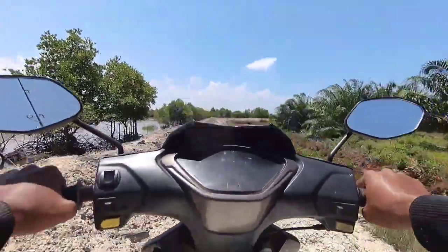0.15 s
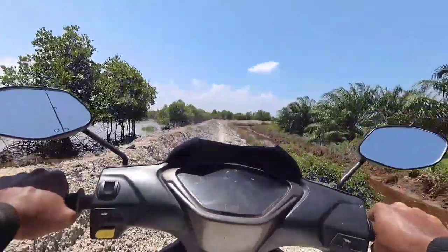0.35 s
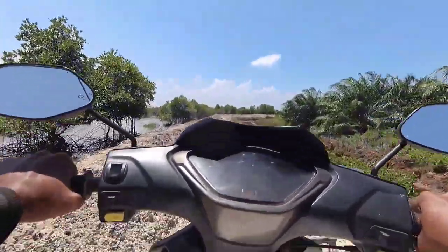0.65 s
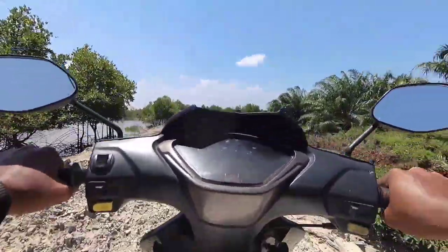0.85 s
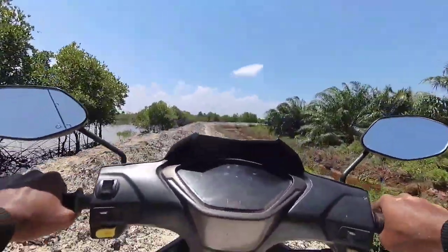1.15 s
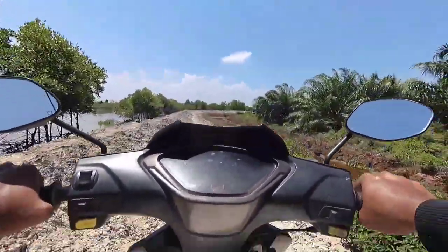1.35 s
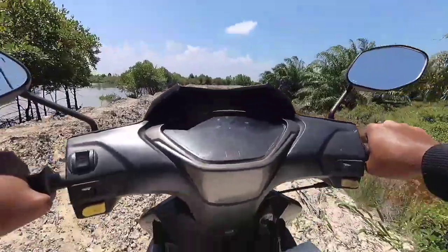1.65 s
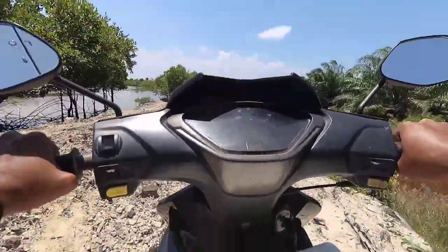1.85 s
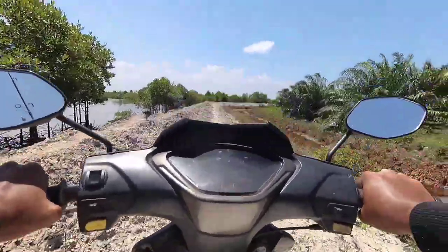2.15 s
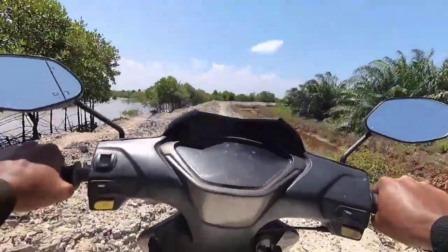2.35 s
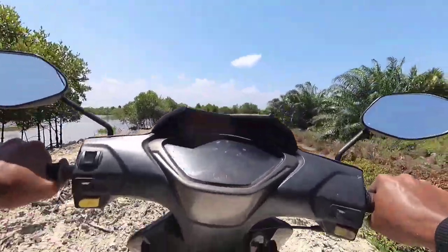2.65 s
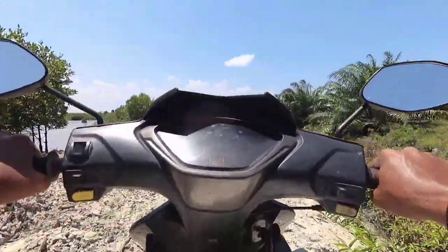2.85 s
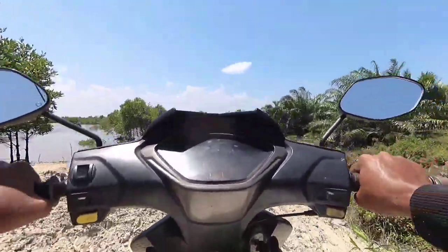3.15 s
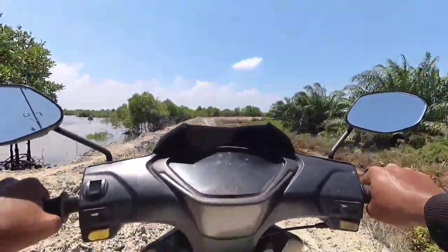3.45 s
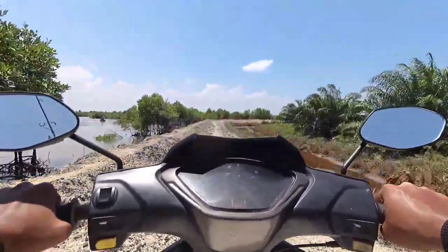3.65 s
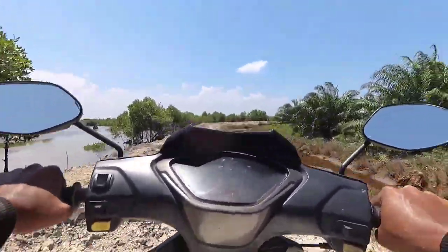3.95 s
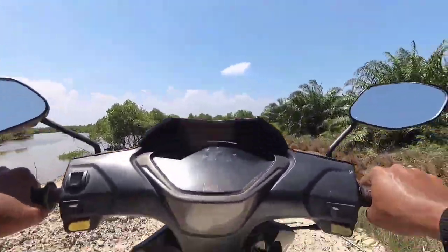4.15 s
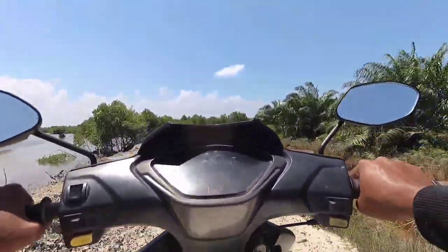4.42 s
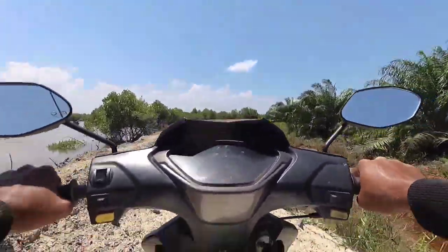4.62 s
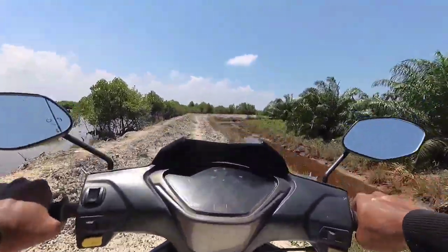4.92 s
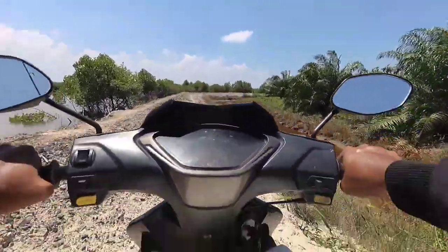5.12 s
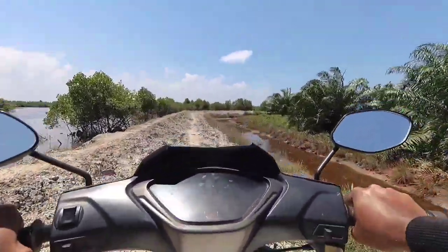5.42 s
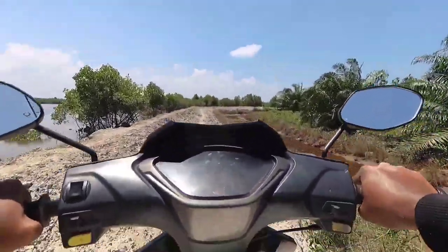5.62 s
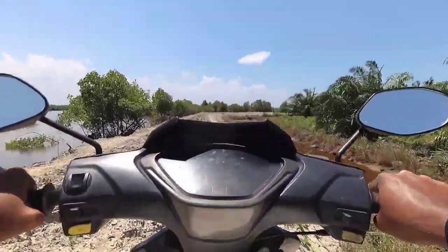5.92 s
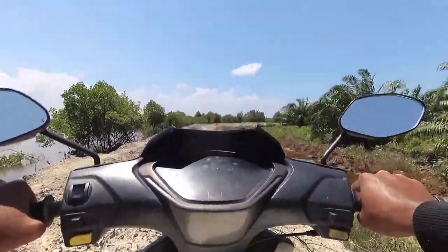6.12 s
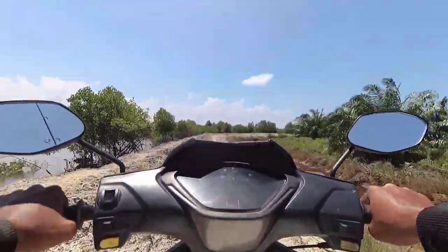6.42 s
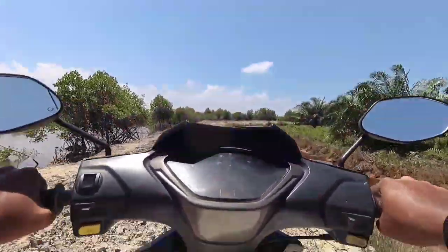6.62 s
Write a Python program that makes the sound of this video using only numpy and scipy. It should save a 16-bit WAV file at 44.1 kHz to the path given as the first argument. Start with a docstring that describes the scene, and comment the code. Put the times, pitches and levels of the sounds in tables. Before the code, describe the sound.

Close up and only in the left channel, a small scooter putts along a rough gravel track, with plastic and metal parts ticking and buzzing. Tyres and air roar hollowly through the bodywork and stones knock against it. The engine slows to a chug, recovers, then slows and pulls up again near the end. Past the middle a short swish passes with a thin squeal. Light wind rumbles on the microphone.

```python
"""Thumping exhaust, a hollow roar and rattling panels: a small single-cylinder scooter, heard close,
rolls slowly along a stony track, the throttle opening and closing. Each firing thumps in the exhaust
and shakes the frame; tyres and air roar through the hollow bodywork, stones and bumps knock it,
and a bright swish passes with a thin squeal. Only the left microphone is live, with wind rumbling
on it; the right one gives nothing but its own faint noise."""
import sys
import numpy as np
from scipy import signal
from scipy.fft import rfft, irfft, next_fast_len
from scipy.io import wavfile
from scipy.ndimage import uniform_filter1d, minimum_filter1d

SR = 44100
rng = np.random.default_rng(int(sys.argv[2]) if len(sys.argv) > 2 else 0)


def persist_wave(psi):
    """Save psi, clipped to +-1, as 16-bit WAV."""
    counts = np.round(np.clip(psi, -1, 1) * 32767).astype(np.int16)
    wavfile.write(sys.argv[1], SR, np.atleast_2d(counts).T)


N = 298557

# engine speed: time_s, firings_per_s
ENGINE_SPEED = [(0.0, 20.01), (0.4, 19.53), (1.1, 19.53), (1.4, 15.27), (1.8, 14.75), (2.1, 13.87),
                (2.35, 14.77), (2.55, 19.13), (2.85, 20.75), (3.3, 20.79), (4.7, 20.75), (4.95, 19.61),
                (5.45, 14.9), (5.9, 17.06), (6.1, 19.88), (6.35, 20.0), (6.55, 19.16), (6.77, 20.22)]
# how hard the engine pulls and how loud the track is: time_s, thump_db, roar_db, panel_hum_db
RIDE_LEVELS = [(0.0, -19.5, -13, -15.5), (0.5, -20.5, -14, -16), (1.1, -18.5, -13.5, -18),
               (1.35, -23, -14, -28), (1.8, -28, -17.5, -23), (2.2, -28, -18, -25.5),
               (2.62, -20.5, -14, -22), (3.0, -18, -13, -17), (3.5, -22.5, -13.5, -23.5),
               (3.8, -23.5, -14, -21), (4.3, -21, -16, -22.5), (4.7, -25.5, -14, -24.5),
               (5.05, -25, -18, -22.5), (5.3, -30.5, -21, -25.5), (5.65, -32.5, -21.5, -27),
               (6.05, -20.5, -15, -22), (6.5, -22.5, -11.5, -23.5), (6.77, -31, -14, -20)]
# the engine labours as it picks up and its chugs stand apart: centre_s, half_length_s, throb_db
LABOURING = [(2.4, 0.12, 3), (5.88, 0.096, 1.5)]
# what each engine cycle rings in the frame: cycle_share, pitch_hz, width_hz, level_db
FRAME_MODES = [(0.3, 409.7, 20.8, 6.5), (0.336, 375.4, 6.7, -8), (0.499, 278, 23, 1.5),
               (0.553, 242.3, 28, 4.5), (0.623, 198.6, 7.9, 0.5), (0.819, 756, 63, -23),
               (0.953, 654, 54, -3.5)]
# tyre and air roar, before the bodywork shades it: frequency_hz, density_db
ROAR_SPECTRUM = [(15, -54), (25, -29.5), (53, -29), (107, -13), (168, -2), (273, 0), (319, -0.5),
                 (508, -5.5), (605, -4.5), (735, -20), (1000, -10), (1270, -31.5), (2060, -16),
                 (2450, -61.5), (2600, -39), (3380, -69), (5720, -120)]
# two hollow spaces in the bodywork: pitch_hz, width_hz
CAVITY_MODES = [(275, 60), (415, 60)]
# how loud each cavity sings against the roar: time_s, lower_db, upper_db
CAVITY_LEVELS = [(0.0, -9.5, -11.5), (6.77, -7.5, -13)]
# the hollow panel's note: time_s, pitch_hz, width_hz
PANEL_NOTE = [(0, 615, 95), (.6, 605, 80), (.86, 622, 80), (.95, 648, 150), (1.25, 627, 150),
              (1.52, 532, 50), (1.62, 600, 60), (2.2, 580, 120), (2.8, 612, 55), (3.1, 590, 50),
              (3.27, 568, 55), (3.5, 590, 40), (3.85, 603, 45), (4.2, 620, 100), (4.35, 685, 70),
              (4.6, 680, 80), (4.75, 620, 90), (5.4, 586, 80), (6.2, 605, 60), (6.5, 630, 120),
              (6.77, 607, 65)]
# the hollow panel hums up briefly: centre_s, half_length_s, lift_db
PANEL_SWELLS = [(1.25, 0.053, 8), (1.585, 0.028, 16.5), (3.3, 0.072, 7), (4.71, 0.025, 8.5),
                (5.04, 0.037, 5.5), (6.33, 0.17, 6.5), (6.7, 0.032, 2.5)]
# rough patches under the wheels: centre_s, half_length_s, rattle_lift_db, frame_lift_db
ROUGH_PATCHES = [(0.17, 0.13, 6.5, 1.5), (0.353, 0.018, 12, 5.5), (0.428, 0.019, 11.5, 9.5),
                 (0.477, 0.019, 8.5, 7.5), (0.623, 0.076, 9.5, 4), (0.776, 0.073, 10, 2.5),
                 (1.023, 0.11, 8.5, 7), (1.24, 0.073, 9.5, 5.5), (1.315, 0.045, 6, -5),
                 (1.615, 0.071, 15, 14), (1.71, 0.0096, 12, 10.5), (2.055, 0.025, 5, 5),
                 (2.597, 0.078, 6.5, 3.5), (2.78, 0.055, 5.5, -4), (2.982, 0.079, 8.5, 2.5),
                 (3.32, 0.076, 7, 8.5), (3.599, 0.057, 8.5, 4), (3.973, 0.062, 6.5, 10),
                 (4.249, 0.016, 8, 4.5), (4.377, 0.081, 2.5, 10), (4.501, 0.028, 1.5, 8),
                 (4.698, 0.08, 5.5, 2), (4.83, 0.033, 5, 8.5), (4.974, 0.098, 6.5, 6),
                 (5.39, .03, 1.5, 11.5), (5.5, 0.062, 3, 5), (5.59, 0.046, 7, 3.5), (6.128, 0.085, 8, 6),
                 (6.35, 0.08, 8.5, 1.5), (6.53, 0.15, 2.5, -7.5), (6.77, 0.031, 10.5, 1.5)]
# loose plastic and metal parts: pitch_hz, tick_db, t60_s, buzz_and_click_db
LOOSE_PARTS = [(1398, 0.5, 0.031, -10), (1890, 6, 0.0098, -4.5), (2190, 3, 0.017, -5.5),
               (2458, -4.5, 0.028, 0), (2780, -11, 0.017, -14.5), (2934, -8, 0.023, -13.5),
               (3300, -2, 0.017, -9.5), (3588, 2, 0.016, -4), (3795, -2.5, 0.025, -5.5),
               (4087, -3, 0.022, -8.5), (4700, -12, 0.016, -15), (5060, -18, 0.003, -25.5),
               (6260, -21, 0.01, -23), (7320, -13, 0.007, -18)]
# a panel taps its mount four times a cycle: cycle_share, level_db
PANEL_TAPS = [(0.0, -3), (0.25, 0), (0.48, -4), (0.75, 0)]
# the hardest rattle clicks: start_s, strength_db, brightness_db_per_octave
HARD_CLICKS = [(0.0458, -28, 1), (0.196, -31.5, -12), (0.3192, -46, 2.0), (0.3355, -27, 1),
               (0.3466, -30, 2.0), (0.4124, -39, 1), (0.4246, -29, 1), (0.4655, -30, -10), (0.4774, -30, 1),
               (0.5166, -31, -1), (0.5307, -29, -6.5), (0.5816, -30, -2), (0.6305, -26.5, 4),
               (0.6567, -33, 0), (0.757, -28, -1), (0.8111, -34, -2), (0.8367, -27, -5), (0.9348, -29.5, 5),
               (1.0101, -45, 0), (1.0271, -39, 2.0), (1.066, -28, 2.0), (1.2118, -28, 1), (1.2226, -27, 4),
               (1.2496, -22.5, 1), (2.023, -33, 5), (2.0464, -51, 2.0), (2.0627, -41, 10),
               (2.5242, -35, 2.0), (2.5713, -36, -3), (2.608, -30, -6), (2.7593, -28, -3),
               (2.934, -34.5, 8), (2.9652, -29, -4), (3.0283, -32, 2.0), (3.2326, -33, -0.5),
               (3.2908, -29, -3), (3.5185, -30, 4), (3.5897, -38, -2), (3.919, -33, 8), (3.9913, -36, 6),
               (4.0143, -34, 4), (4.2453, -27, 2.0), (4.3151, -39, 0), (4.3301, -28, 3), (4.398, -32, 6),
               (4.445, -35, 4), (4.6603, -30.5, 0), (4.6872, -33, -6), (4.7102, -34, 4), (4.7714, -26, 2.0),
               (4.8813, -34, -3), (4.9482, -41, -5), (4.9835, -26, -5), (5.0379, -28, 4), (5.0742, -40, 4),
               (5.1023, -31, -2), (5.1552, -37, -1), (5.2135, -42, 3), (5.3777, -30, 2.0), (5.4681, -37, 9),
               (5.4999, -41, 2.0), (5.513, -35, 7), (5.5555, -39, -3), (5.5972, -30, -9), (5.6256, -36, 12),
               (5.7763, -40, 2.0), (5.833, -33.5, 2.0), (5.894, -38, 6), (5.9474, -32.5, 2.0),
               (6.0132, -37, 4), (6.0386, -33, 8), (6.108, -32, 3.5), (6.1583, -31, -4), (6.314, -27.5, 0),
               (6.3335, -33, 2.0), (6.3565, -24, 1), (6.4846, -29, 4), (6.5266, -39, 6), (6.547, -30, 3),
               (6.564, -30, 3), (6.5994, -33, 6), (6.6857, -33, -8), (6.755, -36, 2.0)]
# knocks on the bodywork from stones and bumps, and low engine chugs as it picks up near 5.8 s:
# start_s, strength_db, pitch_hz, spread_octaves
KNOCKS_AND_CHUGS = [(.04, -14, 950, .3), (1.13, -13, 980, .1), (1.215, -13, 960, .1), (1.555, -5, 520, .08),
                    (1.575, -5, 580, .08), (1.592, -5, 580, .08), (2.046, -5, 940, .12),
                    (2.403, -10, 580, .1), (2.758, -9, 580, .2), (2.92, -13, 815, .1), (4.091, -9, 580, .2),
                    (4.326, -8, 580, .2), (4.694, -8, 580, .15), (4.962, -8, 580, .15),
                    (5.04, -7, 580, .12), (5.073, -9, 580, .12), (5.161, -19, 290, .3),
                    (5.181, -15, 290, .4), (5.179, -20, 1400, .2), (5.186, -10, 1850, .14),
                    (5.1855, -7, 1150, .5), (5.188, -6, 815, .1), (5.188, -10, 290, .5),
                    (5.408, -5, 580, .08), (5.4166, -7, 580, .08), (5.461, -10, 580, .1),
                    (5.804, -17, 500, .8), (5.865, -18, 290, .5), (5.93, -17, 290, .4),
                    (6.339, -7, 580, .1), (6.707, -7, 580, .3)]
# resonances of the bodywork: pitch_hz, level_db, t60_s
BODYWORK_MODES = [(290, 10, .03), (520, -1, .12), (580, 0, .09), (815, -6, .09), (960, -3, .04),
                  (1150, -9, .015), (1400, -6, .012), (1800, -3, .02), (2000, -3, .02)]
# a bright swish in passing: frequency_hz, density_db
SWISH_SPECTRUM = [(2500, -27.5), (4500, -1), (8000, -1.5), (10500, -11.5), (13000, -43.5)]
# colour of the air hiss: frequency_hz, density_db
AIR_SPECTRUM = [(1000, -21.5), (1500, 14.5), (3000, -1), (4500, 3.5), (6000, -2.5), (7300, -4.5),
                (8200, -12.5), (9500, -42), (15000, -95)]
# loudness of the air hiss: time_s, level_db
AIR_LEVEL = [(0, -50), (.32, -53.5), (1.24, -57.5), (1.36, -55.5), (2.28, -56), (2.75, -51.5), (3.6, -55),
             (3.7, -58), (4.6, -50.5), (5.07, -50), (5.28, -54.5), (5.62, -51), (5.7, -51), (6.13, -51.5),
             (6.77, -51.5)]
# wind on the microphone: frequency_hz, density_db
WIND_SPECTRUM = [(12, -43.5), (25, 8.5), (45, 10.5), (70, 17.5), (110, -37)]
# each microphone's own noise: frequency_hz, density_db
SELF_NOISE_SPECTRUM = [(30, -26.5), (100, -11), (240, -1), (500, -4), (1000, -11), (15000, -8.5)]

CRUISE_PER_S = 21.5   # firing rate with the throttle open
FRAME_DB, RATTLE_DB, BUZZ_DB = -7.5, -45, -1.5   # at cruise; frame against roar, buzz against ticks
FRAME_DROP_DB, RATTLE_DROP_DB, BUZZ_DROP_DB, CLICK_DROP_DB = 12.5, 17.5, 20, 22   # per unit of slowing


def exhaust(cycles, centre_share=0.807, spread_share=0.16, cruise_swings=5.65):
    """One round thump per firing, through a silencer that passes no deep bass."""
    slow_ratio = CRUISE_PER_S / in_time(ENGINE_SPEED)[0]
    uneven = slowing() * amp(-1.5 * labour_db())   # uneven with the throttle shut, evener under load
    firing = np.round(cycles - centre_share).astype(int)
    size, late = rng.standard_normal((200, 2))[firing + 1].T
    turn = cycles - centre_share - firing - 0.08 * uneven * late
    swings = cruise_swings * slow_ratio ** 0.47   # per cycle; the thump deepens less than the engine
    envelope = np.exp(-.5 * (turn * slow_ratio ** 2 / spread_share) ** 2)
    thump = amp((0.24 + 4.4 * uneven) * size) * envelope * np.sin(2 * np.pi * swings * turn)
    return amp(in_time(RIDE_LEVELS)[0]) * rms_one(butter(thump, 2, 50, "high"))


def frame(cycles):
    """The frame rings at set points of each engine cycle, louder over rough ground."""
    rung = 0
    for share, hz, width_hz, level_db in FRAME_MODES:
        shakes = once_a_cycle(cycles, share, jitter_s=0.00011, spread_db=2.5)
        rung += amp(level_db) * resonate(shakes, hz, width_hz)
    rung *= amp(0.86 * labour_db() * pulse(cycles, .75))
    level_db = in_time(RIDE_LEVELS)[1] + FRAME_DB - FRAME_DROP_DB * slowing()
    lift_db = bells(ROUGH_PATCHES)[1] + 1.4 * drift(7.5)
    return amp(level_db + lift_db) * rms_one(butter(rung, 2, [170, 800], "band"))


def roar(cycles):
    """Tyres and air sound through the hollow bodywork, all throbbing with the firing."""
    _, roar_db, panel_db = in_time(RIDE_LEVELS)
    roar_db += 0.46 * bells(ROUGH_PATCHES)[1]
    panel_db += bells(PANEL_SWELLS)[0] + 1.6 * drift(1.8)
    throb_db = (1.4 + 4 * slowing() + labour_db()) * pulse(cycles, .78)   # slow firings stand apart
    body = tyres_and_air(throb_db) + duct(throb_db) + amp(.4 * throb_db) * cavities()
    hum = amp(panel_db + 0.27 * throb_db) * hollow_panel()
    from_lull = (cycles - .28 + .5) % 1 - .5
    lull_db = -2.2 * labour_db() * np.exp(-(from_lull / .17) ** 2)   # hush between laboured chugs
    return amp(lull_db) * (amp(roar_db) * body + hum)


def tyres_and_air(throb_db, low_roar_hz=152):
    """Noise in flickering third-octave bands, duller and fuller in the bass as the engine slows."""
    tilt_db_per_octave = 1 - 1.5 * slowing() + 1.1 * drift(25)
    low_roar_db = -3 + 12.5 * slowing() + labour_db()
    shared_db = 1.9 * drift(9) + 0.44 * throb_db
    edges_hz = 25 * 2 ** np.arange(0, 6.8, 1 / 3)
    white = rng.standard_normal((2, N))
    out = 0
    for k, (low, high) in enumerate(zip(edges_hz, edges_hz[1:])):
        band = butter(white[k % 2], 2, [low, high], "band")
        hz = np.sqrt(low * high)
        colour_db = at_hz(ROAR_SPECTRUM, hz) + tilt_db_per_octave * np.log2(hz / 400)
        colour_db += low_roar_db * nearness(hz, low_roar_hz, octaves=0.35)
        out += band * amp(colour_db + shared_db + 2.13 * drift(11.7))
    return rms_one(butter(out, 4, 1000))   # the bodywork shades the treble


def hollow_panel(narrow_hz=22, wide_hz=170):
    """A hollow panel picks a wavering note out of the noise: slow noise carried on that pitch."""
    note_hz, width_hz = in_time(PANEL_NOTE)
    phase = 2 * np.pi * np.cumsum(note_hz) / SR
    narrow = rms_one(butter(rng.standard_normal((2, N)), 2, narrow_hz / 2))
    wide = rms_one(butter(rng.standard_normal((2, N)), 2, wide_hz / 2))
    wide_share = np.clip((width_hz - narrow_hz) / (wide_hz - narrow_hz), 0, 1)
    slow = np.sqrt(1 - wide_share) * narrow + np.sqrt(wide_share) * wide
    return rms_one(slow[0] * np.cos(phase) + slow[1] * np.sin(phase))


def cavities():
    """Two spaces in the bodywork resonate with noise, swelling and fading."""
    return sum(amp(db + 1.7 * drift(5)) * resonant_noise(hz, width_hz, passes=2)
               for (hz, width_hz), db in zip(CAVITY_MODES, in_time(CAVITY_LEVELS)))


def duct(throb_db):
    """A duct under the seat resonates in a steep-sided band of noise."""
    return amp(-21 + 2 * drift(26) + 1.2 * throb_db) * resonant_noise(hz=998, width_hz=248, passes=3)


def rattle(cycles):
    """Ticks, buzz and hard clicks ring the same loose parts, easing as the engine slows."""
    level_db = RATTLE_DB - RATTLE_DROP_DB * slowing() + bells(ROUGH_PATCHES)[0] + 1.5 * drift(22)
    buzz_db = BUZZ_DB - BUZZ_DROP_DB * slowing() + drift(3.5)
    chatter = loose_ticks(cycles) + amp(buzz_db) * panel_buzz(cycles)
    return butter(amp(level_db) * chatter + hard_clicks(), 3, [1200, 7800], "band")


def loose_ticks(cycles):
    """Loose parts tick at random, crowding together twice a cycle."""
    ticks_per_s = 3000 * amp(0.57 * np.cos(4 * np.pi * (cycles - .76)) + 0.64 * drift(25))
    sizes = amp(3.6 * np.minimum(rng.exponential(1, N), 4)) * rng.choice([-1, 1], N)
    ticks = sizes * (rng.random(N) < ticks_per_s / SR)
    return rms_one(sum(amp(db + 1.4 * drift(7)) * ring(ticks * rng.standard_normal(N), hz, t60)
                       for hz, db, t60, _ in LOOSE_PARTS))


def panel_buzz(cycles, uneven_db=3.5):
    """A panel taps its mount in step with the crank, striking the modes unevenly."""
    taps = sum(amp(db) * once_a_cycle(cycles, share, jitter_s=.0014, spread_db=2.8)
               for share, db in PANEL_TAPS)
    taps += .5 * np.roll(taps, 61)   # each tap bounces once
    out = 0
    for k, (hz, _, t60, level_db) in enumerate(LOOSE_PARTS):
        strikes = taps * amp(uneven_db * rng.standard_normal(N))
        out += (-1) ** k * amp(level_db) * ring(strikes, hz, t60)
    return rms_one(out)


def hard_clicks(large_below_hz=3100):
    """Single hard hits on the loose parts; the larger parts fall quiet as the engine slows."""
    start_s, strength_db, brightness = np.transpose(HARD_CLICKS)
    at = (start_s * SR).astype(int)
    scatter_db = rng.normal(0, 2.5, (len(at), len(LOOSE_PARTS)))
    drop_db = CLICK_DROP_DB * slowing()[at]
    out = 0
    for k, (hz, _, t60, level_db) in enumerate(LOOSE_PARTS):
        colour_db = level_db + brightness * np.log2(hz / 3000) - drop_db * (hz < large_below_hz)
        clicks = np.zeros(N)
        clicks[at] = amp(strength_db + colour_db + scatter_db[:, k])
        out += (-1) ** k * ring(clicks, hz, t60)
    return out


def knocks_and_chugs():
    """Stones, bumps and a few low engine chugs ring the bodywork modes near each blow's pitch."""
    out = np.zeros(N)
    for start_s, strength_db, note_hz, octaves in KNOCKS_AND_CHUGS:
        push = np.hanning(int(SR / note_hz) + 3)   # lasts about one swing of the note
        blow = np.zeros(SR // 4)
        blow[:len(push)] = 2 * amp(strength_db) * push / push.sum()
        rung = sum(amp(db) * nearness(hz, note_hz, octaves) * ring(blow, hz, t60)
                   for hz, db, t60 in BODYWORK_MODES)
        cutoff_hz = note_hz * 2 ** min(octaves + .3, 1.6)   # a narrow blow is also a blunt one
        at = round(start_s * SR)
        out[at:at + len(blow)] += butter(rung, 6, cutoff_hz)[:N - at]
    return out


def swish_and_squeal(start_s=4.52, attack_s=0.1, hold_s=0.083, release_s=0.44):
    """A bright swish passes with a thin metallic squeal: broad noise and a narrow resonance."""
    corners_s = start_s + np.cumsum([0, attack_s, hold_s, release_s])
    envelope_db = np.interp(np.arange(N) / SR, corners_s, [-40, 0, 0, -40])
    swish = amp(-55) * coloured(SWISH_SPECTRUM)
    squeal = amp(-41.5) * resonant_noise(hz=3700, width_hz=260, passes=2)
    return amp(envelope_db) * (swish + squeal)


def air_hiss(cycles):
    """Air hisses behind the rattle, lifting over rough ground and pulsing as the engine labours."""
    level_db = in_time(AIR_LEVEL)[0] + 0.27 * bells(ROUGH_PATCHES)[0] + 1.9 * drift(14)
    return amp(level_db + .2 * labour_db() * pulse(cycles, .85)) * coloured(AIR_SPECTRUM)


def wind():
    """Wind rumbles on the microphone, rising and falling with the roar."""
    roar_db = in_time(RIDE_LEVELS)[1]
    return amp(-43.5 + .8 * (roar_db - roar_db.mean()) + drift(10)) * coloured(WIND_SPECTRUM)


def slowing():
    """How far the engine has dropped below cruise: 0 at cruise, about .45 coasting."""
    return np.clip(CRUISE_PER_S / in_time(ENGINE_SPEED)[0] - 1, 0, 1)


def labour_db():
    """Extra throb while the engine picks up."""
    return bells(LABOURING)[0]


def pulse(cycles, share):
    """A cosine that peaks at this share of every engine cycle."""
    return np.cos(2 * np.pi * (cycles - share))


def once_a_cycle(cycles, share, jitter_s, spread_db):
    """One click each time the engine passes a point of its cycle, uneven in time and strength."""
    at = np.flatnonzero(np.diff(np.floor(cycles - share)) > 0)
    late, size = rng.standard_normal((len(at), 2)).T
    at += (late * jitter_s * SR).astype(int)
    clicks = np.zeros(N)
    clicks[np.clip(at, 0, N - 1)] = amp(spread_db * size)
    return clicks


def resonate(x, hz, width_hz):
    """A unit click sets a decaying sine of height 1 ringing."""
    r, w = np.exp(-np.pi * width_hz / SR), 2 * np.pi * hz / SR
    return signal.lfilter([0, np.sin(w)], [1, -2 * r * np.cos(w), r * r], x + 1e-18)


def ring(x, hz, t60):
    """A resonance given by its decay time."""
    return resonate(x, hz, np.log(1000) / (np.pi * t60))


def resonant_noise(hz, width_hz, passes):
    """Noise sent repeatedly through one resonance, rms 1."""
    noise = rng.standard_normal(N)
    for _ in range(passes):
        noise = resonate(noise, hz, width_hz)
    return rms_one(noise)


def coloured(spectrum):
    """Steady noise with the given spectrum, rms 1."""
    size = next_fast_len(N)
    hz = np.maximum(np.arange(size // 2 + 1) * SR / size, 1)
    shaped = rfft(rng.standard_normal(size)) * amp(at_hz(spectrum, hz))
    return rms_one(irfft(shaped, size)[:N])


def drift(rate_hz):
    """Slow random wander of spread 1."""
    step, settle = 40, 2000
    r = np.exp(-2 * np.pi * rate_hz * step / SR)
    noise = rng.standard_normal(N // step + settle + 2)
    slow = signal.lfilter([1], [1, -2 * r, r * r], noise)[settle:]
    return np.interp(np.arange(N) / step, np.arange(len(slow)), rms_one(slow))


def bells(rows):
    """Each row swells and fades as a bell curve; returns the sum for each lift column, in dB."""
    t = np.arange(N) / SR
    return sum(np.exp(-((t - centre_s) / half_s) ** 2) * np.array(lifts_db)[:, None]
               for centre_s, half_s, *lifts_db in rows)


def in_time(rows):
    """Columns of a curve table, one value per sample."""
    time_s, *columns = np.transpose(rows)
    return [np.interp(np.arange(N) / SR, time_s, column) for column in columns]


def at_hz(spectrum, hz):
    """Read a spectrum on a log-frequency axis."""
    points_hz, db = np.transpose(spectrum)
    return np.interp(np.log(hz), np.log(points_hz), db)


def nearness(hz, centre_hz, octaves):
    """A bell curve over pitch, 1 at the centre."""
    return np.exp(-(np.log2(hz / centre_hz) / octaves) ** 2)


def butter(x, order, hz, kind="low"):
    """Low-, high- or band-pass filter."""
    return signal.sosfilt(signal.butter(order, hz, kind, fs=SR, output="sos"), x)


def amp(db):
    """dB to gain."""
    return 10 ** (np.asarray(db) / 20)


def rms_one(x):
    """Scale to rms 1."""
    return x / np.sqrt(np.mean(x ** 2) + 1e-20)


def scene():
    """All sources reach the left microphone; the right stays silent."""
    cycles = np.cumsum(in_time(ENGINE_SPEED)[0]) / SR
    scooter = exhaust(cycles) + frame(cycles) + roar(cycles) + rattle(cycles) + knocks_and_chugs()
    background = swish_and_squeal() + air_hiss(cycles) + wind()
    return np.array([scooter + background, np.zeros(N)])


def record(dry, self_noise_db=-65, cutoff_hz=15330):
    """A look-ahead limiter holds the peaks down, each input adds its own hiss, the top is cut."""
    span = SR // 100
    safe_gain = minimum_filter1d(np.minimum(1, 1 / (np.abs(dry) + 1e-9)), span)
    gain = uniform_filter1d(uniform_filter1d(safe_gain, span // 2), span // 3)
    hiss = amp(self_noise_db) * np.array([coloured(SELF_NOISE_SPECTRUM) for _ in range(2)])
    return signal.sosfilt(signal.cheby2(16, 70, cutoff_hz, fs=SR, output="sos"), gain * dry + hiss)


dry = scene()
out = record(dry)
persist_wave(out)
```